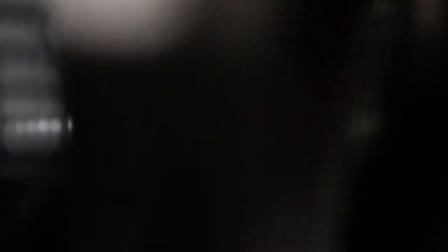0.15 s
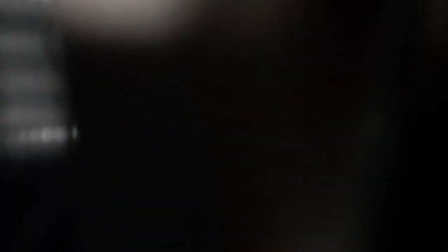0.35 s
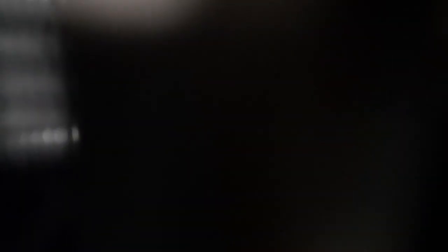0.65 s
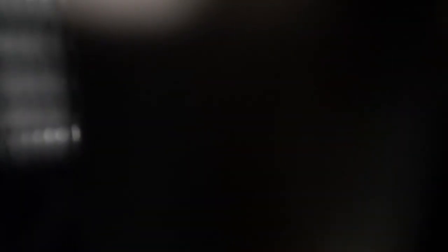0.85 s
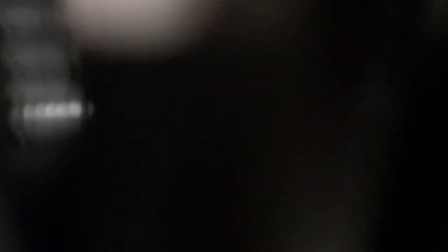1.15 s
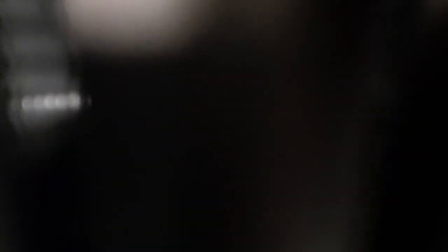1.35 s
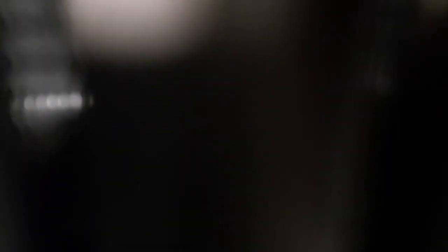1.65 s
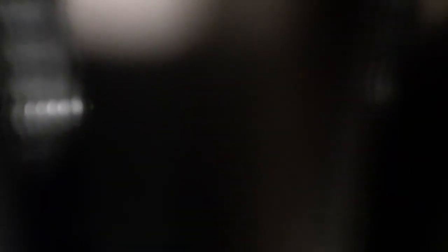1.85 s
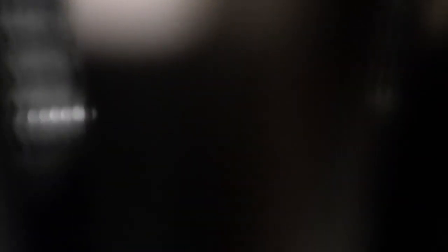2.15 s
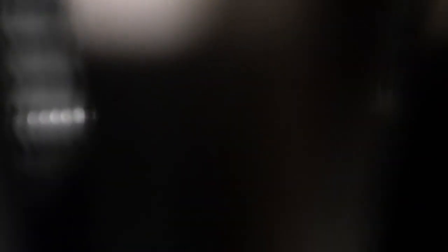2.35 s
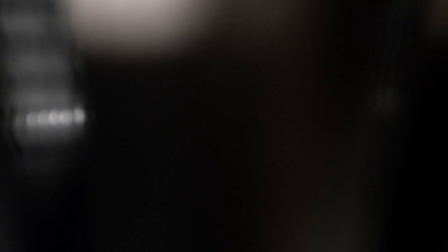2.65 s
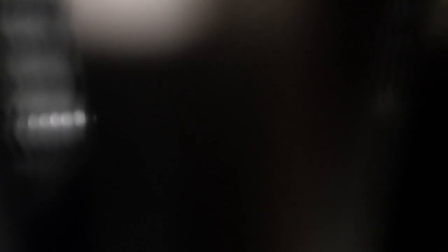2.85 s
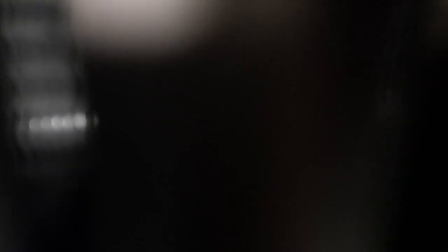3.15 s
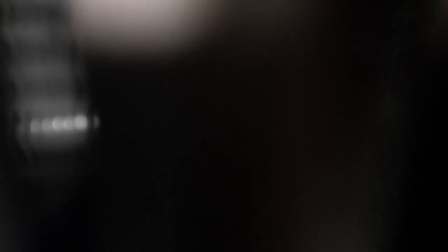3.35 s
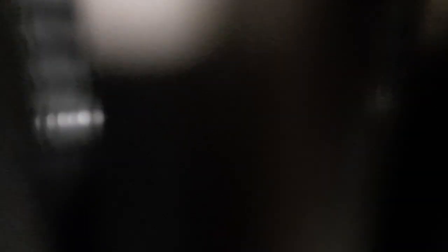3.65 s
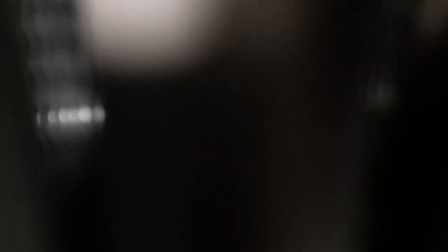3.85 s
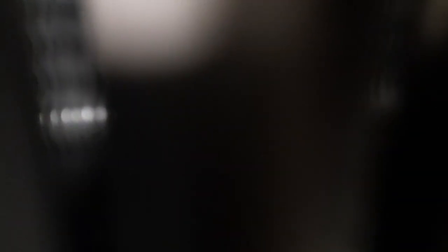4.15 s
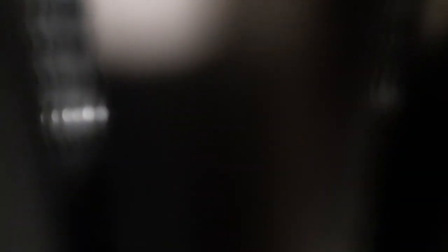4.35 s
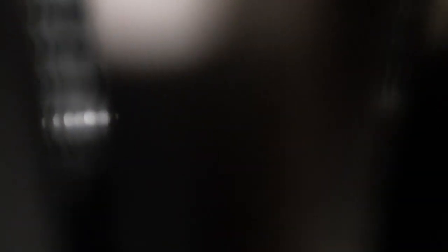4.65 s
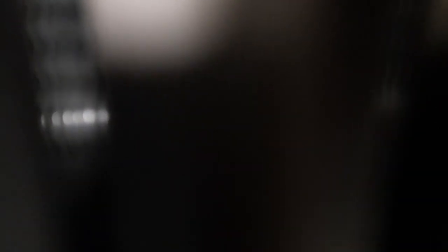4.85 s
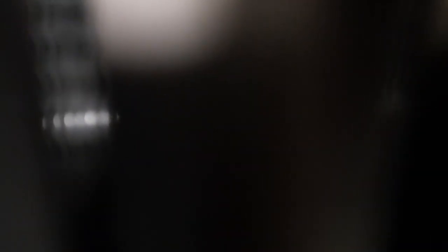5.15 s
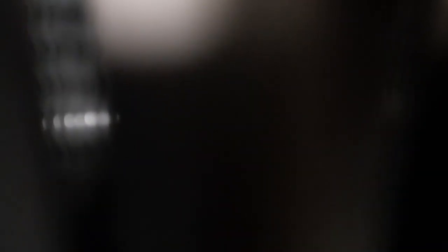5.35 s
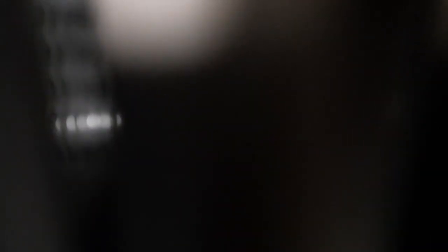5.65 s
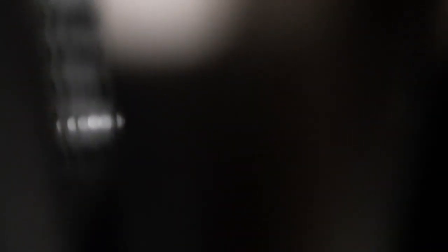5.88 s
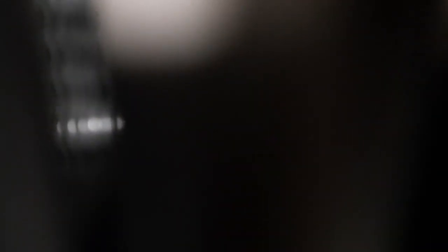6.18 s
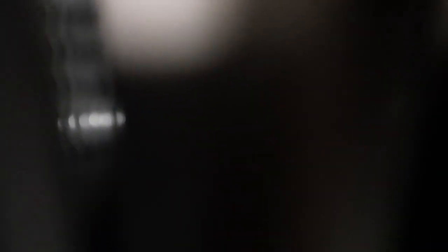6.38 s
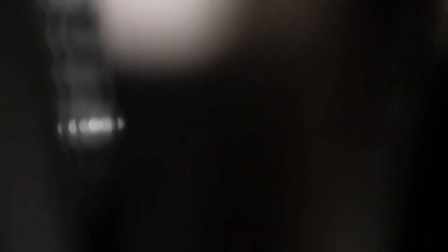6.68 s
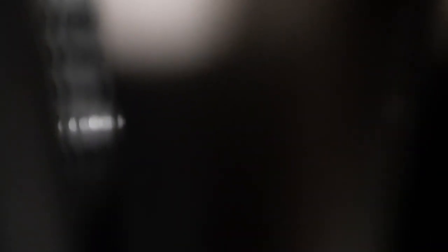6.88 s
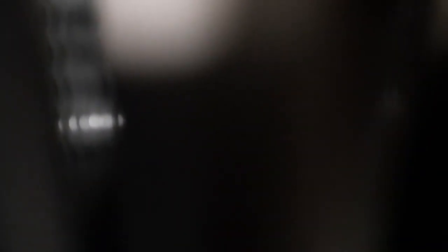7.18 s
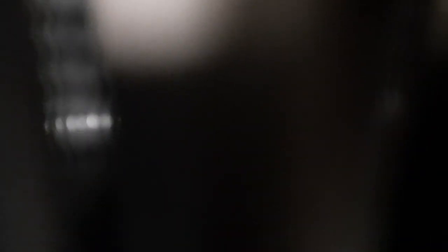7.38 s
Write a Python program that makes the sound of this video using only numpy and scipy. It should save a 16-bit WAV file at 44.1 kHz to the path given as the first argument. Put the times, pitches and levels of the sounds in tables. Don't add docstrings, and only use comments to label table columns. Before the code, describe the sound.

Close, quiet garage ambience in stereo. From 0 to 0.45 seconds fingers rub and drag on a knob, with soft cloth rustle and low cabinet thuds on the left, over a stronger opening hiss. At about 0.46 the detent snaps: a hard, dry clack with bounces until 0.53, rattling sheet metal and a hollow grille ring, mostly damped by 0.6. Afterwards the air conditioner settles: uneven refrigerant hiss, hollow duct sighing and faint whistling. Small bright spits and ticks ring the tubes near 0.7, 1.06, 1.9 to 2.0, 2.4 to 2.7, 3.3, 4.2, 4.8 and, most clearly, 5.06. Light rustles come at 0.8, 4.23 and 6.35. A far engine idles as low, wavering rumble, weaker around 6 and returning by 7.2. Sound dips briefly near 6.45, 6.9 and 7.2, then the hiss continues to 7.5.

```python
import sys
import numpy as np
from scipy import signal
from scipy.fft import rfft, irfft, next_fast_len
from scipy.io import wavfile
from scipy.ndimage import uniform_filter1d

SR = 44100
rng = np.random.default_rng(int(sys.argv[2]) if len(sys.argv) > 2 else 0)


def transcribe(signal):
    frames = np.atleast_2d(signal).T
    limited = np.clip(frames, -1, 1)
    pcm = np.round(limited * 32767).astype(np.int16)
    wavfile.write(sys.argv[1], SR, pcm)


def boost(x):
    u = np.asarray(x, float) / 20
    return 10 ** u


N = 331632
SIZE = next_fast_len(N + SR // 8)
HZ = np.fft.rfftfreq(SIZE, 1 / SR)

# start_s, loudness_db, lope_db (even firing above zero, uneven below), load_db (upper orders)
ENGINE_STATE = [(0, 14, 5, -4), (.1, -2, -4, -2), (.45, -6, 8, 4), (.8, -1, 1, -1), (1.2, 1, -1.5, -2.5),
                (1.9, 1, 4.5, 6.5), (2.3, 0.5, 7.5, 2), (2.5, -3.5, 0, 1), (2.78, 2, -3.5, 4.5),
                (3.2, -2, -1, 2), (3.55, 2, -2, -2), (4.2, 4.5, -1, -0.5), (4.75, -3, -0.5, 1.5),
                (5.7, -3, 6, 0.5), (5.95, -15, -2, 4), (6.6, -9.5, -2.5, -1.5), (7.2, -2, -3, -2),
                (7.52, -3, 1, 0)]
# centre_hz, width_hz, level_db, left_right_db, right_lead_rad
TUBE_MODES = [(2235, 48, -24, 6, 1.75), (2912, 150, -33.5, -7.5, 1), (3357, 176, -27, 2.5, -2),
              (3960, 59, -37, -6.5, 4), (4440, 227, -26, 6.5, 1.5), (5420, 170, -25, 6, 4.5),
              (5694, 99, -28, -2, 4), (6220, 186, -31.5, 1, 0.5), (7320, 180, -36, 1, -1.5),
              (7870, 400, -35, 35, -4)]
# start_s, blow_db, rattle_db, crack_db
SNAP_HITS = [
    (0.4627, -16.5, -20, -13.5),
    (0.4742, -26, -49, -42),
    (0.487, -23.5, -34, -28),
    (0.511, -41, -38, -34),
    (.533, -36, -38.5, -50),
]
SNAP_S = SNAP_HITS[0][0]
# pitch_hz, level_db, t60_s
PANEL = [(128, -1, 0.16), (890, -10, 0.087), (1950, -5, 0.055), (3770, -16, 0.069)]
# centre_hz, left_right_db
CABINET_SIDE = [(60, 5.0), (110, 8), (200, 23), (380, 8.5), (700, 9), (1290, 5.5), (2380, 6), (4400, 7),
                (8120, 3), (15000, 8)]


def evened(x):
    return x / np.sqrt(np.mean(x ** 2) + 1e-20)


def read(points, hz):
    f, value = np.transpose(points)
    return np.interp(np.log(hz + 1), np.log(f + 1), value)


def curve(table, axis):
    rows = np.array(table)
    return np.interp(np.arange(N) / SR, rows[:, 0], rows[:, axis])


def control(table, axis):
    return boost(curve(table, axis))


def bumps(rows):
    t = np.arange(N) / SR
    return sum(db * np.exp(-((t - s) / length_s) ** 2) for s, db, length_s in rows)


def add(mix, s, sound):
    part = mix[:, round(s * SR):][:, :sound.shape[1]]
    part += sound[:, :part.shape[1]]


def pan(left_right_db):
    return boost(np.array([[.5], [-.5]]) * left_right_db)


def notch(hz, centre_hz):
    return 1 - .9 * np.exp(-((hz - centre_hz) / 900) ** 2)


def flutter(top_hz):
    pole = np.exp(-2 * np.pi * top_hz * 128 / SR)
    coarse = signal.lfilter([1], [1, -pole], rng.standard_normal(N // 128 + 2))
    return np.interp(np.arange(N), np.arange(len(coarse)) * 128, evened(coarse))


def ring(modes, shared, own_db, own_hz):
    out = np.zeros((2, len(HZ)), complex)
    for hz, width_hz, db, pan_db, lead_rad in modes:
        drive = rfft(rng.standard_normal(N) * shared * boost(own_db * flutter(own_hz)), SIZE)
        shape = boost(db) / (1 + 1j * (HZ - hz) / (0.63 * width_hz)) ** 2
        out += drive * shape * np.array([[1], [boost(-pan_db) * np.exp(1j * lead_rad)]])
    return irfft(out, SIZE)[:, :N]


def engine():
    # start_s, cycle_hz
    idle = [(0.0, 14.22), (0.75, 14.43), (1.5, 14.27), (2.25, 14.23), (3.0, 14.17), (3.75, 14.5),
            (4.5, 14.44), (5.25, 14.15), (6.0, 14.12), (6.75, 13.86), (7.5, 13.84)]
    # order, level_db, share of lope
    orders = [(4, -49.5, 0.83), (5, -49, -1.4), (6, -64, -0.68), (7, -54, -0.083), (8, -53.5, -0.068),
              (9, -59, 0.17)]
    turns = np.cumsum(curve(idle, axis=1)) / SR
    loud_db, lope_db, load_db = [curve(ENGINE_STATE, axis=k) for k in (1, 2, 3)]
    out = boost(-59) * np.sin(2 * np.pi * 3 * turns)
    for order, db, share in orders:
        phase = 2 * np.pi * (round(order) * turns + rng.random()) + .1 * (order - 3) * flutter(1.5)
        level_db = db + 2.0 + loud_db + share * lope_db + 1.3 * flutter(0.98)
        if order > 6.5:
            level_db = level_db + 1.42 * load_db
        out += boost(level_db) * np.sin(phase)
    return out


def rumble():
    # centre_hz, width_hz, level_db, left_right_db, right_lead_rad
    garage = [(67.7, 14, -11, -11, -0.1), (78, 36, -4, 2.5, 0.), (102.3, 9.2, -1, 0, -0.45),
              (120.6, 9.6, -2, -5, 0.046)]
    drive = boost(-43 + 0.41 * curve(ENGINE_STATE, axis=1))
    return boost(21.5) * ring(garage, drive, own_db=1., own_hz=0.8)


def duct_air(drive, pressure_db):
    # centre_hz, width_hz, level_db, left_right_db, right_lead_rad
    duct = [(182, 16.8, -6, 8, -6), (215.6, 27, -18, -6, -13), (299.2, 23.6, 2.5, 0, -0.54),
            (325.4, 28, -0.5, -1, -1.23), (361.4, 42.3, -0.5, -1.5, -0.83), (396.6, 26, -4.5, 1.5, -0.5),
            (556.8, 33.5, -9, 5, 0), (675.5, 54, -9.5, 6.5, 4), (844.3, 47, -12.5, 6, -0.5),
            (1009.4, 17, -12.5, 6.5, 3), (1460.6, 83.5, -12.5, 3.5, -1.4), (1678, 41, -21, 2.5, -0.54)]
    # start_s, level_db, half_length_s
    gusts = [(1.3, 2.5, 0.094), (1.95, 1, .1), (2.4, 0, 0.13), (3.85, 3, 0.033), (4.25, 2, 0.1),
             (4.97, -2, 0.14), (4.2, 1.5, 0.12), (5.3, 1, 0.19), (6.1, 2, 0.033), (6.8, 1.5, 0.035),
             (7.1, -4, 0.17)]
    sigh = boost(24.5) * ring(duct[:-2], drive * boost(bumps(gusts)), own_db=1., own_hz=0.77)
    whistle_drive = boost(-42.5 + 0.22 * pressure_db)
    return sigh + boost(24.0) * ring(duct[-2:], whistle_drive, own_db=2.36, own_hz=1.2)


def refrigerant(flow, fizz):
    # centre_hz, width_hz, level_db, left_right_db, right_lead_rad
    fins = [(9970, 220, -39.5, 19, 1.9), (11210, 190, -33.5, 26, 2), (11740, 480, -42, 14, -1.7),
            (15000, 400, -39, 4, 1.8)]
    leak = [(13330, 300, -34.5, 9, .7)]
    # start_s, level_db
    leak_level = [(0, -2), (.9, -8), (1.1, -1), (2.4, -1), (3.6, -2), (3.8, -20), (7.52, -13)]
    gurgle = boost(0.71 * flutter(42))
    out = boost(38.5) * ring(TUBE_MODES, flow * gurgle, own_db=3., own_hz=4)
    out = out + boost(49) * ring(fins, fizz * gurgle, own_db=3., own_hz=6)
    return out + boost(53.0) * ring(leak, fizz * control(leak_level, axis=1), own_db=2., own_hz=6.5)


def air(low_gain, top_gain):
    # centre_hz, level_db per Hz
    left = [(30, -25), (150, -22.5), (450, -13.5), (1100, -29), (2050, -33), (2550, -38.5), (3200, -31),
            (4300, -36.5), (4900, -47), (6500, -35.5), (9200, -51), (11000, -38), (12700, -39),
            (15500, -41.5)]
    # centre_hz, level_db per Hz
    right = [(30, -36), (150, -19), (450, -33.5), (1100, -29), (2050, -34), (2550, -37.5), (3200, -35),
             (4300, -33.5), (4900, -35), (6500, -33.5), (9200, -58), (11000, -60), (13000, -41.5),
             (15500, -50)]
    colour = boost(np.array([read(left, HZ), read(right, HZ)]))
    draw = rng.standard_normal((2, N))
    top = 1 / (1 + (8800 / (HZ + 1)) ** 12)
    z = rfft(draw * low_gain, SIZE) * (1 - top) + rfft(draw * top_gain, SIZE) * top
    same = np.clip(0.93 / (1 + (HZ / 550) ** 3), 0, 1)
    z[1] = same * z[0] + np.sqrt(1 - same ** 2) * z[1]
    hz, _, field = signal.stft(irfft(z * colour, SIZE)[:, :N], SR, nperseg=512)
    patches = uniform_filter1d(rng.standard_normal(field.shape[1:]), size=9, axis=0)
    patches = evened(uniform_filter1d(patches, size=6, axis=1))
    patch_db = 2.5 * patches * hz[:, None] / (hz[:, None] + 2500)
    return signal.istft(field * boost(patch_db), SR, nperseg=512)[1][:, :N]


def machine():
    # start_s, level_db
    pressure = [(0, -2.5), (.9, -2), (1.9, .5), (3.3, 1), (4.25, -1.5), (4.6, -1.2), (5.9, -1.6), (6.5, -4),
                (7.52, -1)]
    # start_s, level_db, half_length_s
    surges = [(0, 13.5, 0.05), (.21, 3.5, 0.085), (.42, 6.5, 0.24), (1.2, 2, 0.32), (1.42, -1, 0.18),
              (2.05, 0, 0.11), (2.42, 1, 0.18), (2.81, 0, .15), (3.46, 2, 0.058), (4.21, 3, 0.2),
              (4.94, 1.5, 0.18), (5.34, 1, 0.044), (6.35, 4, 0.16), (6.72, -2, .08), (7.27, -2, 0.15),
              (7.44, -3, 0.14)]
    pressure_db, surge_db = curve(pressure, axis=1), bumps(surges)
    duct = boost(-42.5 + 0.69 * pressure_db + 0.077 * surge_db)
    flow = boost(-56 + 0.58 * pressure_db + surge_db)
    fizz = boost(-65.5 + 0.52 * pressure_db + 0.66 * surge_db)
    wash = boost(1.53 * flutter(51))
    low_gain = boost(32) * np.sqrt(duct * flow) * wash
    top_gain = boost(50.0) * fizz * wash ** 1.5 * boost(1.2 * flutter(8.7))
    return duct_air(duct, pressure_db) + refrigerant(flow, fizz) + air(low_gain, top_gain)


def spits():
    # start_s, peak_db, pitch_hz, left_right_db, length_s
    pockets = [(0.689, -51, 5420, 2, 0.021), (0.75, -48, 5420, 2, 0.029), (1.056, -42.5, 4530, -1, .012),
               (1.576, -54, 4630, 14, 0.028), (1.914, -45.5, 4550, -1, 0.009),
               (1.972, -45, 5420, 4, 0.0087), (1.973, -50, 4030, 3, .007), (1.989, -47, 4450, 2, .008),
               (1.995, -50, 6300, -3, .016), (2.42, -48, 4490, 2, .008), (2.467, -47.5, 3940, 4, .012),
               (2.651, -43, 5450, 2, 0.006), (2.647, -42, 6100, 1, .004), (2.654, -49, 6200, 1, .003),
               (2.651, -50, 4500, 2, .01), (2.724, -51.5, 4540, 0., 0.012), (3.25, -49.5, 5440, 6, 0.0088),
               (3.287, -45.5, 5330, 4, 0.013), (3.309, -48, 5420, 4, 0.02), (3.334, -49, 4370, 2, 0.017),
               (3.766, -48, 4480, -.6, .01), (3.991, -50, 4450, 0, .01), (4.193, -44.5, 4390, 4, 0.0065),
               (4.202, -45, 4400, 0, 0.014), (4.246, -48, 5370, 4, .008), (4.257, -45, 4400, -1, 0.0075),
               (4.28, -51, 4440, 2., .014), (4.281, -52, 7900, 12, .008), (4.441, -50.5, 4430, -1, .012),
               (4.787, -53, 6340, 12, .006), (4.831, -49, 8170, 17, .004), (4.863, -48, 4370, 5, 0.0081),
               (4.881, -46.5, 5420, 6, 0.0089), (5.058, -41, 5500, 6, 0.015), (5.065, -46, 5430, 0, 0.025),
               (5.066, -42.5, 6200, -1, 0.006), (5.076, -47, 6100, 1, .005), (5.067, -49, 3960, 3, .012),
               (5.003, -57, 6250, 0, .018), (6.525, -53, 6200, 2, 0.018)]
    out, hz_axis, t = np.zeros((2, N)), np.fft.rfftfreq(4096, 1 / SR), np.arange(4096) / SR
    for s, db, hz, pan_db, length_s in pockets:
        burst = (1 - np.exp(-t / 0.0023)) * np.exp(-(t / length_s) ** 2)
        tone = 0.053 * 4.5 * np.cos(2 * np.pi * hz * t)
        puff = rfft((rng.standard_normal(4096) + tone) * burst)
        shape = 1 / (1 + 1j * (hz_axis - hz) / 110) ** 2
        for tube_hz, *_ in TUBE_MODES[:-2]:
            near = boost(-3.5 - 9 * abs(np.log2(tube_hz / hz)))
            shape = shape + near / (1 + 1j * (hz_axis - tube_hz) / 180) ** 2
        sound = irfft(puff * shape * np.array([[1], [np.exp(1j * 1.49)]]))
        add(out, s, boost(db + 3.5) * sound / abs(sound).max() * pan(pan_db))
    return out


def rustles():
    # start_s, level_db, length_s, centre_hz
    strokes = [(0.234, -52, 0.056, 11000), (0.328, -51, 0.038, 11100), (0.411, -48.5, 0.052, 4500),
               (0.613, -64, .02, 11000), (0.817, -51, 0.022, 4940), (1.347, -59, .02, 11000),
               (2.895, -56, 0.016, 12000), (3.83, -55, .02, 11000), (4.233, -48, 0.038, 3500),
               (4.276, -53, 0.039, 9000), (5.326, -55, .02, 11000), (6.335, -52.5, 0.057, 5900),
               (6.38, -57, 0.025, 6940)]
    out, hz_axis = np.zeros((2, N)), np.fft.rfftfreq(8192, 1 / SR)
    for s, db, length_s, hz in strokes:
        swell = np.sin(np.pi * np.clip(np.arange(8192) / SR / length_s, 0, 1))
        grain_db = 3. * np.repeat(rng.standard_normal(128), repeats=64)
        grains = rng.standard_normal((2, 8192)) * boost(grain_db)
        band = np.exp(-(np.log((hz_axis + 1) / hz) / 0.91) ** 2)
        wide = evened(irfft(rfft(grains) * notch(hz_axis, 9200) * band))
        add(out, s, boost(db) * wide * swell * boost(np.array([[3.], [-3.5]])))
    return out


def hand():
    # start_s, level_db
    rub = [(0.0, -26.5), (0.018, -43), (0.148, -37.5), (0.228, -43.5), (0.256, -68), (0.282, -43),
           (0.326, -61), (0.43, -30), (0.452, -42)]
    shake = control(rub + [(.4625, -79)], axis=1) * boost(2. * flutter(40))
    # centre_hz, width_hz, level_db, left_right_db, right_lead_rad
    modes = [(111.6, 17, 2, 5.3, 1.1), (216, 97, -5.0, 4.7, 2.1), (307, 61, 4.0, 11.0, 0.36),
             (610, 270, -12.0, 9, 1.5), (863, 62, -15.0, 13, 1.1)]
    return boost(21.0) * ring(modes, shake, own_db=0.75, own_hz=30)


def undamped(t, damped_s, fall_s):
    return 1 / (1 + np.exp(np.clip((t + SNAP_S - damped_s) / fall_s, -30, 30)))


def panels():
    # pitch_hz, level_db, t60_s, damped_s, left_right_db
    held = [(122.6, -25, 0.87, 0.62, 1.5), (266, -32.5, 0.68, 0.61, 14), (415, -34, .4, 0.58, 6),
            (849, -27, 1.2, 0.501, 12), (1410, -41, .5, 0.57, 4), (2595, -31, 0.39, 0.572, 3),
            (2700, -32.5, 0.32, 0.54, 4), (2350, -52, .2, .56, 3), (336, -28.5, .5, 0.55, 16),
            (3250, -48, .3, 0.59, -1), (4400, -43, .2, .53, 0)]
    out, t = np.zeros((2, N)), np.arange(SR // 4) / SR
    for hz, db, t60_s, damped_s, pan_db in held:
        loose = np.clip(hz / 200 - .6, 0, 1)
        tone = -np.sin(2 * np.pi * (hz * (t - .0057) + loose * rng.random((2, 1)))) * pan(pan_db)
        rise = 1 - np.exp(-(t / (0.012 + 3.9 / hz)) ** 2)
        add(out, SNAP_S, boost(db - 60 * t / t60_s) * undamped(t, damped_s, 0.0041) * tone * rise)
    return out


def ticks():
    # start_s, level_db
    contacts = [
        (.5108, -37),
        (.4905, -55),
        (.4630, -33),
        (2.651, -52),
        (4.8328, -52),
        (4.258, -54),
        (5.068, -58),
    ]
    out, t, hz_axis = np.zeros((2, N)), np.arange(128) / SR, np.fft.rfftfreq(256, 1 / SR)
    for s, db in contacts:
        snap = np.diff(rng.standard_normal((2, 129))) * np.exp(-(t / 0.00051) ** 2)
        z = rfft(snap, 256) * notch(hz_axis, 9300) / (1 + (hz_axis / 13000) ** 8) * 2
        add(out, s, boost(db) * irfft(z) * pan(6.))
    return out


def grille():
    out, t = np.zeros((2, N)), np.arange(SR // 4) / SR
    add(out, SNAP_S, -boost(-18) * np.exp(-((t - .006) / .0006) ** 2) * pan(10.))
    throb = 1 + .3 * np.cos(2 * np.pi * 45 * (t - .006)) + 1.8 * np.exp(-t / .007)
    tone = -np.sin(2 * np.pi * 289 * (t - np.array([[.0052], [.0055]]))) * pan(8.)
    tone = tone * np.array([1 + 0 * t, 1 - np.exp(-(t / 0.013) ** 2)])
    rise = 1 - np.exp(-(t / .003) ** 2)
    add(out, SNAP_S, boost(-18.5 - 60 * t / 1.6) * undamped(t, .525, .004) * throb * tone * rise)
    return out


def rattle(frames):
    # centre_hz, level_db per Hz
    colour = [(80, -50), (130, -29), (300, -13.5), (700, -17.5), (1200, -24), (2000, -24), (2700, -25),
              (3300, -31), (5500, -35.5), (7700, -44), (9100, -66), (12500, -57), (15500, -66)]
    # centre_hz, t60_s
    decay = [(100, 0.86), (260, 0.36), (700, 0.28), (1840, 0.27), (4850, 0.21)]
    hz, t = np.fft.rfftfreq(256, 1 / SR), np.arange(frames) * 64 / SR
    z = rng.standard_normal((frames, 129, 2, 2)).T
    db = read(colour, hz)[:, None] - 60 * t / read(decay, hz)[:, None]
    side = pan(read(CABINET_SIDE, hz))[:, :, None]
    tail = signal.istft((z[0] + 1j * z[1]) * boost(db) * side, nperseg=256, noverlap=192)[1]
    return tail / abs(tail).max()


def knob():
    cabinet = PANEL + [(174, -22, 0.16), (212, -8.5, 0.25), (245.3, -6, 0.29), (334, -25, 0.13),
               (676, -27, 0.083)] + [(333, -25, 0.1), (417, -15.5, 0.46), (580, -9.0, 0.126),
               (820, -15, 0.072), (990, -23, 0.17), (1440, -15, 0.1)]
    out, t = np.zeros((2, N)), np.arange(SR // 2) / SR
    t_crack = t[:999]
    for hit, (s, blow_db, rattle_db, crack_db) in enumerate(SNAP_HITS):
        turn = rng.random((len(cabinet), 2, 1))
        body = np.zeros((2, len(t)))
        for k, (hz, db, t60_s) in enumerate(cabinet):
            late_rad = np.array([[0], [1]]) * turn[k, 1] * 3 + turn[k, 0] * .5 + 2 * np.pi * hz * 0.0063
            light = 1 / (1 + (hit * 200 / hz) ** 4)
            fall = boost(db - 60 * t / np.clip(0.91 * t60_s, .03, .6))
            body += light * pan(read(CABINET_SIDE, hz)) * fall * np.sin(2 * np.pi * hz * t - late_rad)
        add(out, s, -boost(blow_db) * body * (1 - np.exp(-(t / 0.0053) ** 2)))
        shake = rattle(frames=260)
        add(out, s, boost(rattle_db + 8) * shake)
        crack = np.diff(shake[:, 200:1200]) * np.exp(-(t_crack / 0.0087) ** 2)
        crack = crack * (1 - 0.33 * np.exp(-t_crack / .001))
        add(out, s, boost(crack_db) * crack / abs(crack).max())
    return out


def scene():
    background = engine() + rumble() + machine() + spits() + rustles()
    return background + hand() + panels() + ticks() + grille() + knob()


def top_cut(x):
    return signal.sosfilt(signal.butter(12, 16620, fs=SR, output="sos"), x)


def record(dry):
    # start_s, level_db, half_length_s
    dips = [
        (6.446, -7.5, 0.048),
        (6.897, -5, 0.08),
        (7.214, -4, 0.078),
    ]
    low = signal.sosfiltfilt(signal.butter(2, 5000, fs=SR, output="sos"), dry)
    dip_db = bumps(dips)
    sunk = low * boost(dip_db) + (dry - low) * boost(0.5 * dip_db)
    cut = signal.sosfilt(signal.butter(4, 42, "highpass", fs=SR, output="sos"), sunk)
    edge = signal.firwin(2047, 15770, window=("kaiser", 9), fs=SR)
    return top_cut(signal.oaconvolve(cut, edge[None], "same"))


dry = scene()
out = record(dry)
transcribe(out)
```